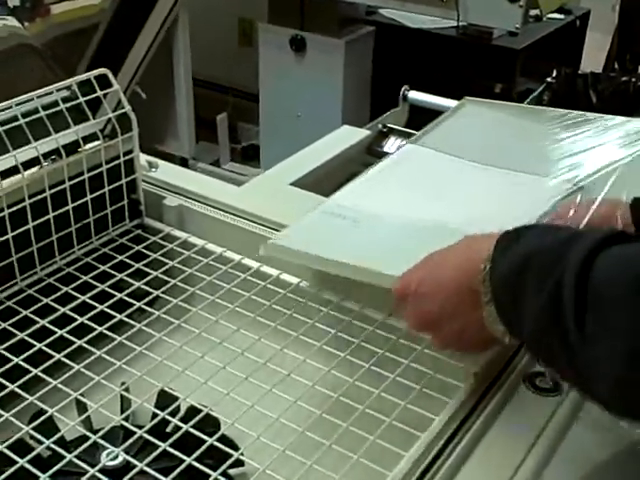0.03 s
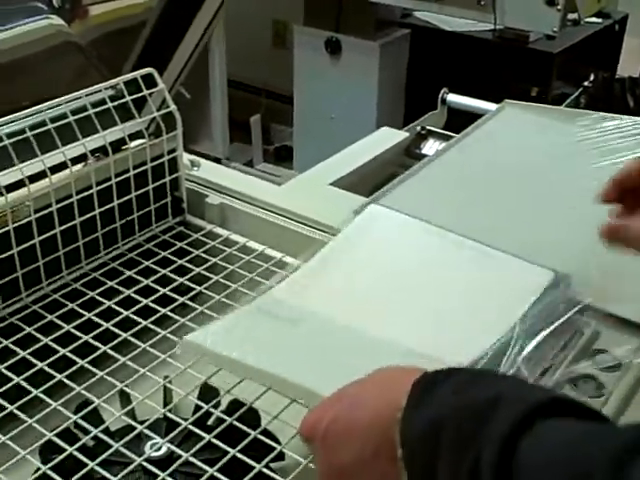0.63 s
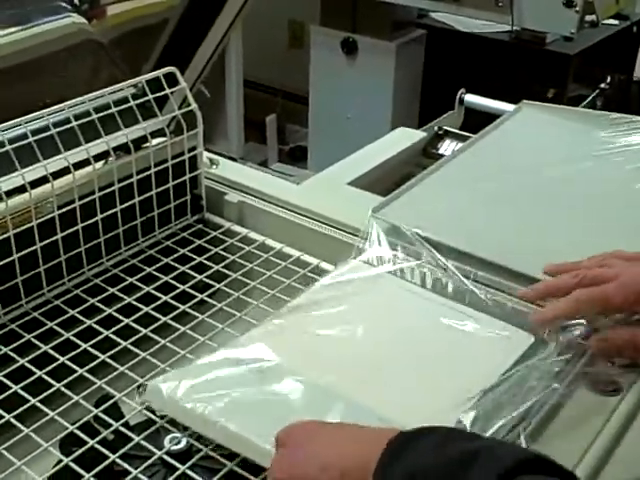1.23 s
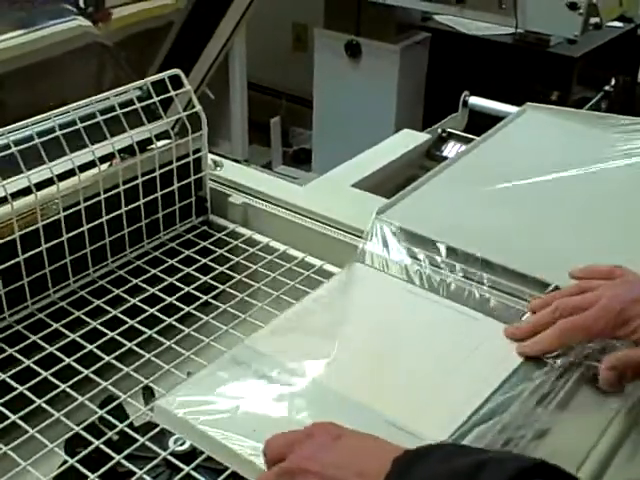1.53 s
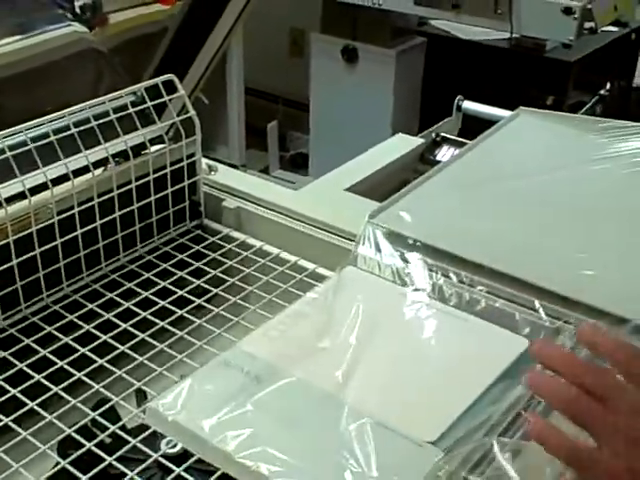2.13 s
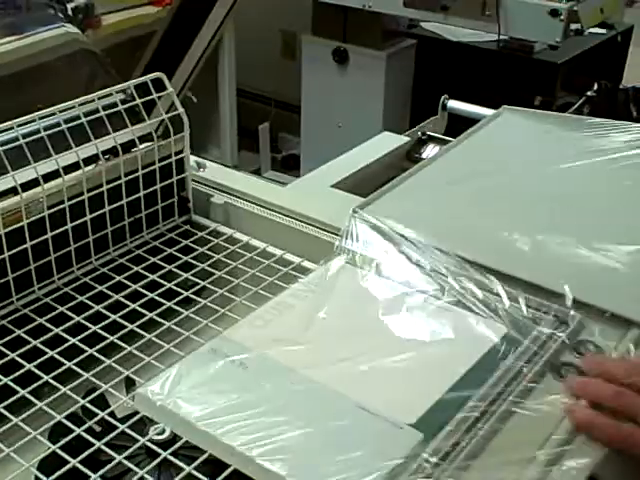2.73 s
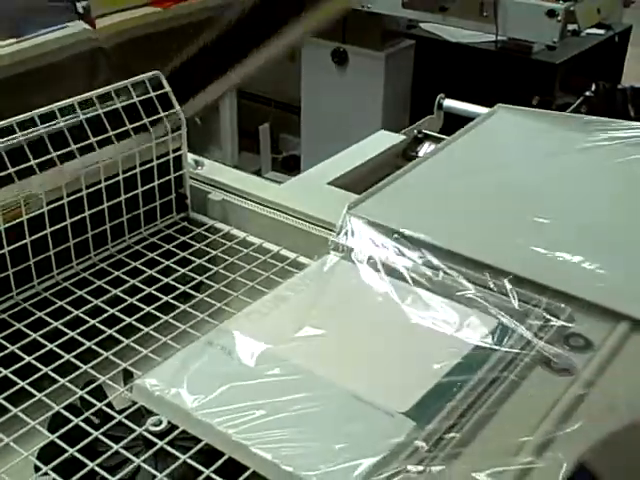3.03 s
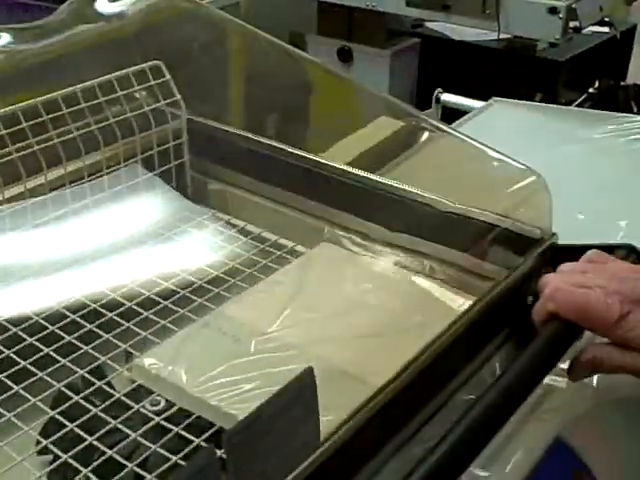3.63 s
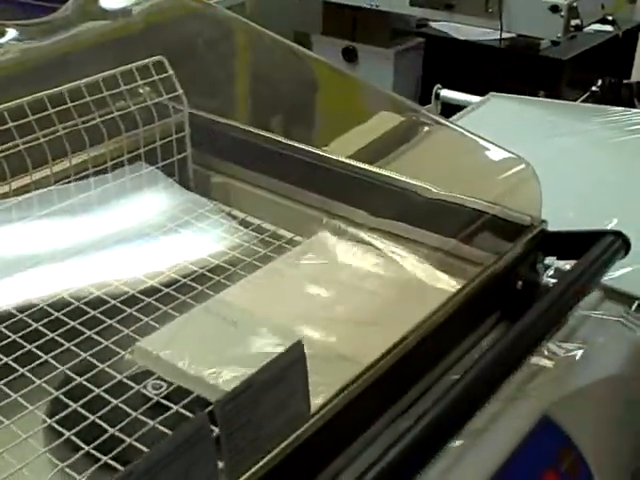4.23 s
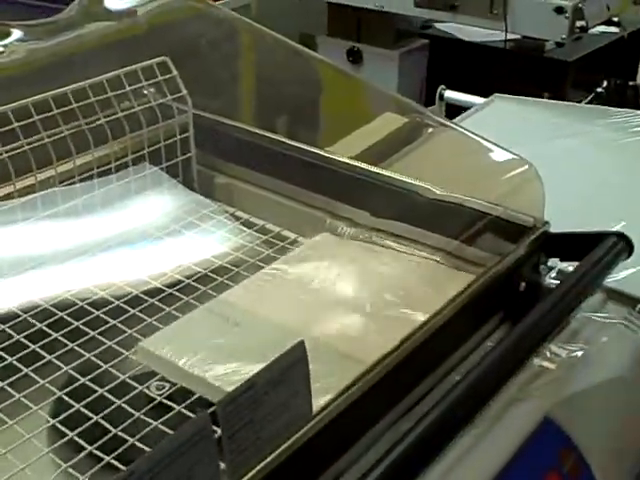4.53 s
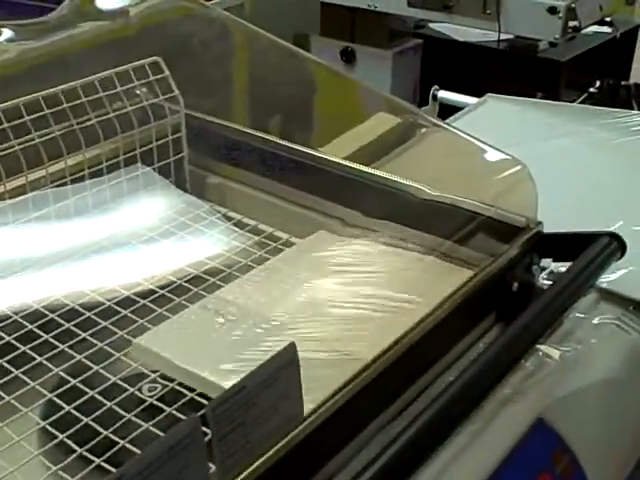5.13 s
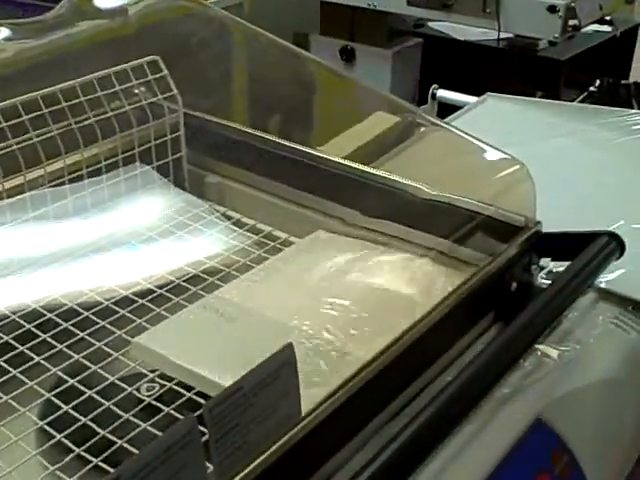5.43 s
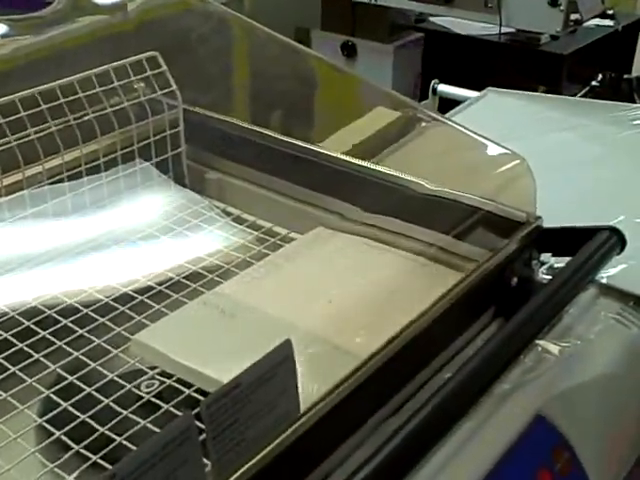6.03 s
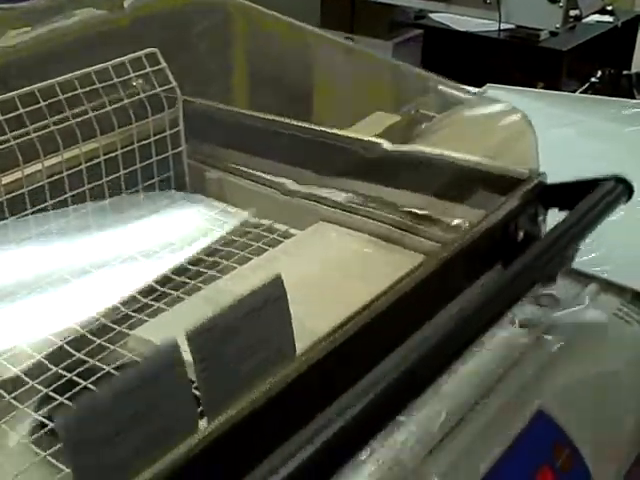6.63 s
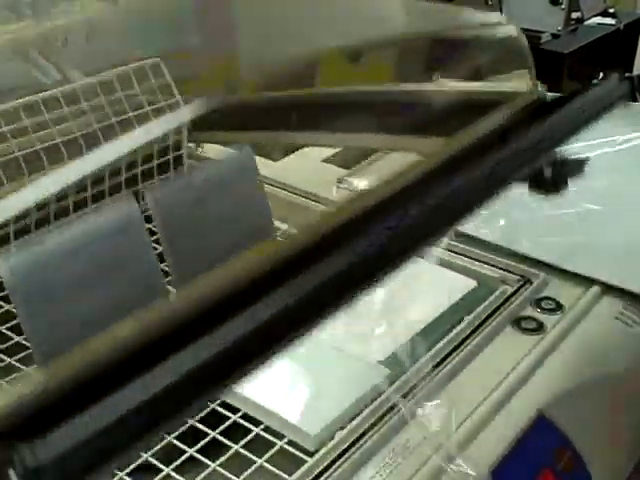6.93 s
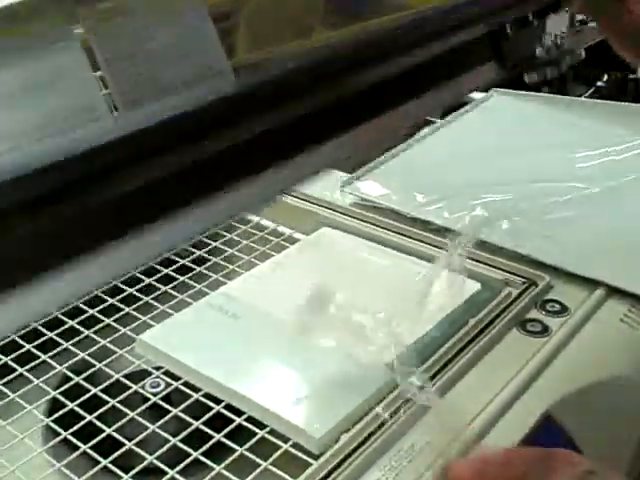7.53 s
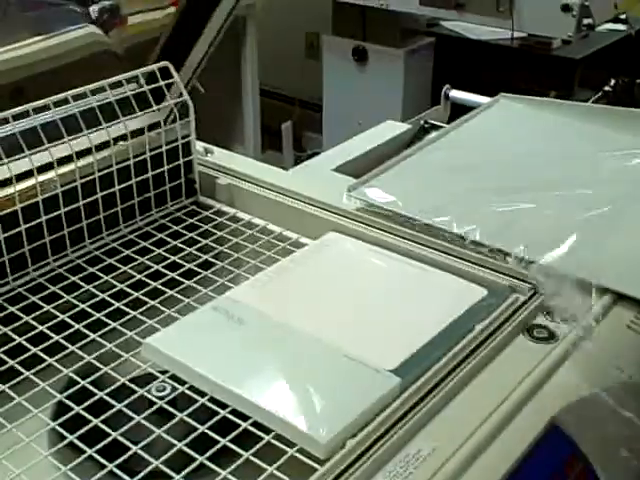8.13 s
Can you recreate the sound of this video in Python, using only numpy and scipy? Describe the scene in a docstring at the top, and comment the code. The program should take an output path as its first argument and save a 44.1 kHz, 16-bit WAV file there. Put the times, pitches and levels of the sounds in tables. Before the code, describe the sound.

Plastic film crinkles, a shrink-wrap machine's hood clacks shut, a fan rushes, then the hood clacks open and the film peels with a squeal.

```python
"""A workshop, at arm's length from a chamber shrink-wrap machine whose transformer hums throughout.
A booklet slides in over the wire tray while its film buckles in crinkles and slips in short zips.
The hood clacks shut, exciting the modes of the frame, and a fan drives turbulent hot air round the
resonant chamber. The hood booms as it loosens, the magnet latch lets go with a ringing clack and the
fan runs down. Last, the sealed film peels off the bar in stick-slip motion, with a falling squeal."""
import sys
import numpy as np
from scipy import signal
from scipy.fft import rfft, irfft
from scipy.io import wavfile
from scipy.ndimage import uniform_filter1d

SR = 44100
rng = np.random.default_rng(int(sys.argv[2]) if len(sys.argv) > 2 else 0)


def dump(signal):
    """Clip the signal to [-1, 1] and save it as 16-bit WAV at the path in sys.argv[1]."""
    limited = np.clip(np.atleast_2d(signal).T, -1, 1)
    pcm = np.round(limited * 32767).astype(np.int16)
    wavfile.write(sys.argv[1], SR, pcm)


N = 365148
T = np.arange(N) / SR

# Travel of the hood. Each row: time in seconds, opening from 0 (shut) to 1.
HOOD_OPENING = [(0, 1), (2.95, 0.96), (3.45, 0.32), (3.6, 0), (6.4, 0), (7.05, 0.4), (7.5, .55),
                (7.9, 0.84)]
# Mains hum. Each row: hood opening from 0 to 1, relative levels in dB of harmonics 2, 3 and 4.
HUM_LEVELS = [(0, -42.5, -41.5, -49), (.4, -38.5, -33, -49.5), (1, -37, -38.5, -43)]
# Air resonances of the chamber. Each row: frequency in Hz, bandwidth in Hz, relative level in dB.
CHAMBER_MODES = [(181, 25, -41), (363.8, 19, -36.5), (505, 9.8, -42.5), (536.7, 19, -37), (739, 80, -42.5)]
# Hand movements. Each row: start in seconds, hold in seconds, relative level in dB, T60 in seconds.
BOOKLET_PUSHES = [(0, 0.043, -39.5, 0.58), (.21, .22, -34, 0.6), (.6, 0.16, -37.5, 0.29),
                  (.88, .17, -36.5, 0.39), (2.68, 0.1, -37, 0.57)]
FILM_CRINKLES = [(0, 1.01, -34, 1.23), (.2, 0.41, -35.5, 0.18), (2.3, .1, -33, 0.71),
                 (2.66, 0.091, -35.5, .1), (2.77, .1, -25, 0.12), (7.42, 0.089, -43, 0.71),
                 (7.85, 0.069, -33, .1), (7.907, 0.25, -19.5, .09), (8.17, 0.14, -30, .1)]
# Knocks of tray and hood. Each row: start in seconds, peak in dB, resonance in Hz, T60 in seconds.
HOLLOW_KNOCKS = [(1.063, -25.5, 825, 0.047), (3.386, -32, 600, 0.33), (3.672, -21, 1300, 0.016)]
# Film brushed by a hand or by itself. Each row: midpoint in seconds, level in dB, length in seconds.
FILM_SWISHES = [(1.38, -30.5, 0.12), (1.719, -41.5, 0.18), (1.89, -32, 0.074), (1.923, -30.5, 0.042),
                (3.397, -41, 0.064), (7.49, -30.5, .04), (7.629, -32.5, 0.075)]
# Creases snapping through. Each row: start in seconds, relative level in dB, T60 in seconds.
CREASE_SNAPS = [(0.094, -13.5, 0.061), (0.2076, -9.5, 0.04), (.226, -11, 0.083), (.3195, -10.5, 0.025),
                (0.3484, -8, 0.038), (.377, -12.5, .08), (.416, -9, 0.045), (0.5446, -9, 0.048),
                (.5643, -5.5, 0.018), (.6595, -12, .054), (.723, -15, 0.069), (0.8772, -10, 0.072),
                (.97, -13, 0.046), (1.001, -13.5, 0.083), (1.029, -14.5, .047), (1.1335, -13.5, .073),
                (2.252, -19, 0.2), (2.2593, -4.5, 0.031), (2.3351, -16, .05), (2.5194, -19, 0.038),
                (2.6933, -12.5, .037), (2.704, -11, 0.05), (2.7282, -15.5, .05), (2.81, -7, 0.066),
                (2.9483, -7.5, .041), (7.381, -22, 0.045), (7.4288, -19.5, .015), (7.47, -19, 0.014),
                (7.5395, -12, 0.011)]
# Peel fronts. Each row: start in seconds, length in seconds, first and last slip rate in Hz,
# relative level in dB, slope of the harmonics in dB per octave.
PEEL_FRONTS = [(2.746, .07, 469, 783, -32, -2), (2.787, 0.033, 2590, 3250, -29, -2),
               (2.808, .022, 1745, 2270, -29, -4), (2.827, .023, 2630, 3150, -19.5, -2),
               (2.854, .042, 3750, 6700, -24.5, -1), (7.848, 0.058, 7050, 4600, -28, -1),
               (7.898, .063, 3700, 2745, -20, 8), (7.911, 0.051, 2580, 2330, -22.5, 4),
               (7.953, .068, 2386, 1840, -19, 5), (8.04, .235, 900, 709, -24.5, -2.5),
               (8.108, 0.041, 580, 596, -26.5, -5.5)]
# The hood striking the sealing frame. Each row: start in seconds, crack level in dB.
HOOD_LANDINGS = [(3.574, -2.5), (3.586, -10.5), (3.642, -17)]
# The magnet latch catching, chattering and letting go.
# Each row: start in seconds, crack level in dB, relative ring level in dB.
LATCH_CLACKS = [(3.548, -19, -14.5), (3.736, -20.5, -23.5), (3.803, -28, -34), (3.863, -26.5, -29),
                (6.886, -6.5, .5), (6.903, -8.5, -4.5), (6.94, -20.5, -22)]
# Structural modes. Each row: frequency in Hz, relative level in dB, T60 in seconds.
STEEL_MODES = [(4140, -13, .15), (4565, -19, .2), (4849, -15, .42), (5226, -11, .22), (5404, -9.5, .18),
               (5443, -7.5, .44), (5604, -6, .12), (5767, -7, .18), (5944, -23, .85), (6086, -4.5, .23),
               (6531, -7.5, .16), (6654, -6, .14), (6987, -6, .24), (7066, -7, .22), (7406, -6.5, .18),
               (7483, -2, .2), (7665, -7, .16), (8519, -14, .1)]  # latch and sealing frame
SWAY_MODES = [(32.7, -19, .55), (53, -4, 0.21), (158, -6, 0.14)]  # frame on its legs
# Spectral envelopes. Each row: frequency in Hz, relative level in dB.
ROOM_SPECTRUM = [(20, -5.5), (45, -9.5), (100, -11.5), (180, -7.5), (330, -13), (600, -20.5), (1200, -32),
                 (3200, -27), (6500, -22.5), (7500, -22), (8700, -43.5)]
AIR_SPECTRUM = [(25, -11), (60, 1), (160, 0.5), (260, -4.5), (440, -10), (720, -9.5), (1070, -19),
                (1300, -16.5), (2800, -14), (4600, -14), (6100, -8), (7200, -12.5), (8700, -37.5)]
GAP_SPECTRUM = [(40, -34), (75, -13), (176, -3.5), (256, -15.5), (440, -19.5), (530, -12), (1000, -24),
                (2300, -16.5), (4700, -23), (6300, -13.5), (8700, -39.5)]
SLIDE_SPECTRUM = [(20, -1), (40, 5), (80, -7.5), (170, 5), (400, -5.5), (750, -5.5), (1100, -22.5),
                  (2000, -18.5), (4000, -19.5), (8000, -40)]
FILM_SPECTRUM = [(300, -21), (520, -13), (800, -12.5), (1050, -16.5), (2200, -14), (4300, -9.5), (6300, 2),
                 (7400, -2.5), (8700, -24.5)]
SQUEAL_SPECTRUM = [(300, -13), (600, -1.5), (800, -3.5), (1400, -11.5), (2300, -2.5), (3000, -3),
                   (3800, -7.5), (5000, -2), (6000, 5), (7000, -4), (8200, -20)]
CRACK_SPECTRUM = [(100, -11), (400, -2.5), (800, -5), (1500, -6.5), (3200, -1), (4500, -4), (5600, 3.5),
                  (6600, 7.5), (7500, -3), (8500, -19.5)]
THUMP_SPECTRUM = [(15, -15), (30, -3), (52, -2.5), (90, -7), (160, -6), (250, -13), (480, -14), (900, -26),
                  (2000, -33), (5000, -47.5)]


def undb(db):
    """Amplitude ratio of a level in dB."""
    return 10 ** (np.asarray(db) / 20)


def unit(x):
    """Normalisation to an RMS of 1."""
    return x / np.sqrt(np.mean(x ** 2) + 1e-18)


def since(start):
    """Seconds elapsed since start, zero before it."""
    return np.maximum(T - start, 0)


def fade(t, t60):
    """Exponential decay, falling 60 dB in t60 seconds."""
    return np.exp(-np.log(1000) * t / t60)


def add(out, start, x):
    """Superposition of a short sound at start seconds."""
    i = max(int(start * SR), 0)
    out[i:i + len(x)] += x[:max(N - i, 0)]


def colour(x, spectrum, size=8192):
    """Minimum-phase filtering to a spectral envelope, preserving the power of white noise."""
    hz, db = np.transpose(spectrum)
    bins_hz = np.maximum(np.arange(size // 2 + 1) * SR / size, 1)
    magnitude = unit(undb(np.interp(np.log(bins_hz), np.log(hz), db)))
    cepstrum = irfft(np.log(magnitude))
    cepstrum[1:size // 2] *= 2
    cepstrum[size // 2 + 1:] = 0
    return signal.fftconvolve(x, irfft(np.exp(rfft(cepstrum))))[:len(x)]


def noise(samples=N):
    """White Gaussian noise."""
    return rng.standard_normal(samples)


def wander(rate):
    """Smooth random fluctuation of unit RMS, drawn rate times a second."""
    step = int(SR / rate)
    stairs = np.repeat(noise(N // step + 1), step)[:N]
    return unit(uniform_filter1d(uniform_filter1d(stairs, step), step))


def crackle(rate, spread_db):
    """Shot noise: about rate clicks a second, a few much larger than the rest."""
    size = undb(spread_db * np.minimum(rng.exponential(size=N), 4))
    return unit((rng.random(N) < rate / SR) * size * np.sign(noise()))


def burst(start, t60, rise=.001):
    """Many tiny contacts sum to noise that builds over rise seconds and decays."""
    out, t = np.zeros(N), T[:SR // 3]
    add(out, start, (1 - np.exp(-t / rise)) * fade(t, t60) * noise(len(t)))
    return out


def ringing(modes):
    """Free vibration of a struck body: one second of damped sinusoids."""
    t = T[:SR]
    return sum((-1) ** k * undb(db) * fade(t, t60) * np.sin(2 * np.pi * hz * t)
               for k, (hz, db, t60) in enumerate(modes))


def hand_envelope(movements, attack_s=.013):
    """Amplitude envelope of hand movements that each swell, hold and decay."""
    return sum(undb(db) * (1 - np.exp(-since(start) / attack_s)) * fade(since(start + hold), t60)
               for start, hold, db, t60 in movements)


def hood_opening():
    """The hood's position, interpolated linearly in time."""
    return np.interp(T, *np.transpose(HOOD_OPENING))


def reflections(x, t60, wet_db=-11):
    """Reverberation: echoes from the machine and near walls merge into a decaying tail."""
    t = T[:SR // 2]
    tail = noise(len(t)) * fade(t, t60) * (t > .003)
    return x + undb(wet_db) * signal.fftconvolve(x, tail / np.linalg.norm(tail))[:N]


def room_noise():
    """Broadband background noise of nearly constant level."""
    return undb(-41 + .51 * wander(5.5)) * colour(noise(), ROOM_SPECTRUM)


def transformer(mains_hz=60):
    """Shading and reflection by the hood set the level of each wavering mains harmonic."""
    opening = hood_opening()
    positions, *levels = np.transpose(HUM_LEVELS)
    hum = np.zeros(N)
    for harmonic, db in enumerate(levels, 2):
        gain = undb(np.interp(opening, positions, db) + 2 + .5 * wander(6))
        hum += gain * np.sin(2 * np.pi * (harmonic * mains_hz * T + rng.random()))
    return hum


def fan(on_s=3.77, off_s=6.802, run_up_s=.54, coast_s=.47, db_per_decade=63):
    """Turbulence noise grows as a power of blower speed and excites the chamber's air resonances."""
    speed = np.tanh(since(on_s) / run_up_s) / (1 + since(off_s) / coast_s)
    flow_gain = undb(1.16 + db_per_decade * np.log10(speed + 1e-9))
    air = undb(-27.5 + .47 * wander(14)) * colour(crackle(rate=12000, spread_db=2.5), AIR_SPECTRUM)
    for hz, width, db in CHAMBER_MODES:
        resonator = signal.iirpeak(hz, hz / width, fs=SR)
        air += undb(db) * unit(signal.lfilter(*resonator, noise()))
    return flow_gain * (air + rim_rush())


def rim_rush(full_opening=.092, surge_s=6.525, surge_width_s=.12):
    """Air leaks under the hood's rim, surges as the seal breaks and rushes through the open gap."""
    leak = undb(-19)
    gap = undb(-10) * np.clip(hood_opening() / full_opening, 0, 1)
    surge = undb(-1) * np.exp(-((T - surge_s) / surge_width_s) ** 2)
    return (leak + gap + surge) * undb(-21 + 1.46 * wander(25)) * colour(noise(), GAP_SPECTRUM)


def hood_boom(peak_s=6.57, rise_s=.039, t60=.63, first_hz=178, last_hz=120.5, sink_s=.086):
    """Flow-induced vibration: the loosened shell drones briefly in the air stream, sinking in pitch."""
    swell = np.exp(np.minimum(T - peak_s, 0) / rise_s) * fade(since(peak_s), t60)
    gain = swell * undb(-15.5 + 1.7 * wander(49.5))
    hz = last_hz + (first_hz - last_hz) * np.exp(-(since(peak_s) / sink_s) ** 2)
    hz *= 1 + .0385 * wander(60)
    return gain * np.sin(2 * np.pi * np.cumsum(hz) / SR)


def tray(knock_q=3.1):
    """The booklet bumps over the tray's wires in small impacts; knocks excite a cavity resonance."""
    gain = hand_envelope(BOOKLET_PUSHES) * undb(2.5 + 1.2 * wander(30))
    out = gain * colour(crackle(rate=1400, spread_db=2.5), SLIDE_SPECTRUM)
    for start, db, hz, t60 in HOLLOW_KNOCKS:
        impact = burst(start, t60, rise=.00019) + 1e-18
        hollow = signal.lfilter(*signal.iirpeak(hz, knock_q, fs=SR), impact)
        out += undb(db) * hollow / np.abs(hollow).max()
    return out


def film():
    """Buckling creases radiate dense clicks and single snaps; sliding friction adds swishes."""
    gain = hand_envelope(FILM_CRINKLES) * undb(-.5 + 1.5 * wander(110))
    out = gain * crackle(rate=4000, spread_db=3)
    for middle, db, length in FILM_SWISHES:
        swell = np.hanning(int(length * SR))
        add(out, middle - length / 2, undb(db) * swell * noise(len(swell)))
    # a snap is one sharp click, then an uneven avalanche of smaller ones
    grain = unit(undb(2.5 * wander(900)))
    for start, db, t60 in CREASE_SNAPS:
        click = undb(-1) * burst(start, t60=.0046, rise=.0001)
        avalanche = undb(-6.5) * grain * burst(start, t60)
        out += undb(db) * (click + avalanche)
    return colour(out, FILM_SPECTRUM)


def peeling(jitter=.018, flutter_db=3, settle=1.9, harmonics=12, top_hz=8700):
    """Stick-slip motion: the film lets go in nearly periodic slips, heard as a harmonic squeal."""
    out = np.zeros(N)
    for start, length, first_hz, last_hz, db, tilt_db in PEEL_FRONTS:
        samples = int(length * SR)
        progress = np.linspace(0, 1, samples)
        # a pulled front speeds up steadily; a slackening one slows and levels off
        glide = progress if last_hz > first_hz else np.expm1(-settle * progress) / np.expm1(-settle)
        unevenness = unit(uniform_filter1d(noise(samples), 40))
        flutter = unit(uniform_filter1d(noise(samples), 150))
        slip_hz = first_hz * (last_hz / first_hz) ** glide * (1 + jitter * unevenness)
        phase = 2 * np.pi * np.cumsum(slip_hz) / SR
        slips = sum(undb(tilt_db * np.log2(k)) * np.cos(k * (phase + k)) * (k * slip_hz < top_hz)
                    for k in range(1, harmonics + 1))
        envelope = undb(db - 6.5 + flutter_db * flutter) * signal.windows.tukey(samples, .21)
        add(out, start, envelope * unit(slips))
    return colour(out, SQUEAL_SPECTRUM)


def hood_clacks(landing_t60=.074, latch_t60=.135, rebound_s=3.611, gap_s=.061, loss_db=3.5):
    """Impact excitation: hood and latch crack and ring the steel; the hood's thumps sway the frame."""
    crack, ring, thump = np.zeros((3, N))
    steel, sway = ringing(STEEL_MODES), ringing(SWAY_MODES)
    landings = [(start, db, db - 21, landing_t60) for start, db in HOOD_LANDINGS]
    latchings = [(*row, latch_t60) for row in LATCH_CLACKS]
    for start, crack_db, ring_db, t60 in landings + latchings:
        crack += undb(crack_db) * burst(start, t60, rise=.0013)
        add(ring, start, undb(ring_db - 6.5) * steel)
    # the hood lands, then rebounds at an even pace, each rebound weaker
    landing_thumps = [(start, db - 11) for start, db in HOOD_LANDINGS]
    rebounds = [(rebound_s + k * gap_s, -18 - k * loss_db) for k in range(5)]
    for start, db in landing_thumps + rebounds:
        thump += undb(db) * burst(start, t60=.24, rise=.00091)
        add(ring, start, undb(db - 2) * sway)
    impacts = colour(crack, CRACK_SPECTRUM) + colour(thump, THUMP_SPECTRUM)
    return reflections(impacts, t60=.39) + ring


def scene():
    """Linear superposition of all the sources in one channel."""
    handling = reflections(film() + tray() + peeling(), t60=.24)
    return (handling + hood_clacks() + fan() + hood_boom() + transformer() + room_noise())[None]


def record(dry, mic_hz=8700, ceiling=.77, top_hz=16000):
    """Band limiting and clipping: a small microphone loses the top and overloads on the hardest clacks."""
    heard = signal.sosfilt(signal.cheby1(12, .3, mic_hz, fs=SR, output="sos"), dry)
    clipped = np.clip(heard, -ceiling, ceiling)
    return signal.fftconvolve(clipped, signal.firwin(255, top_hz, fs=SR)[None], mode="same")


dry = scene()
out = record(dry)
dump(out)
```